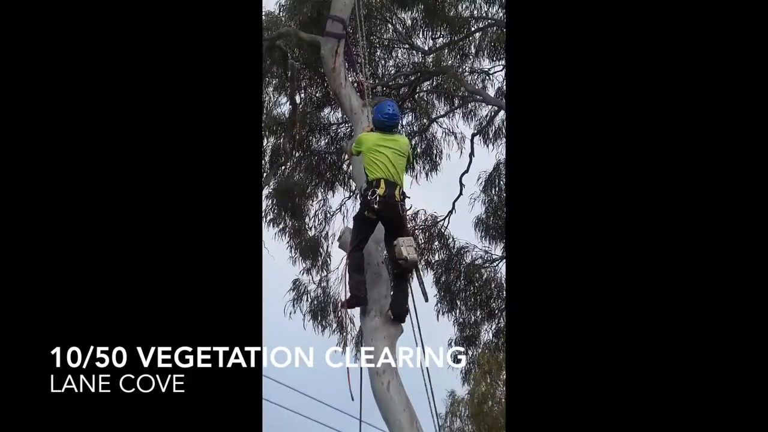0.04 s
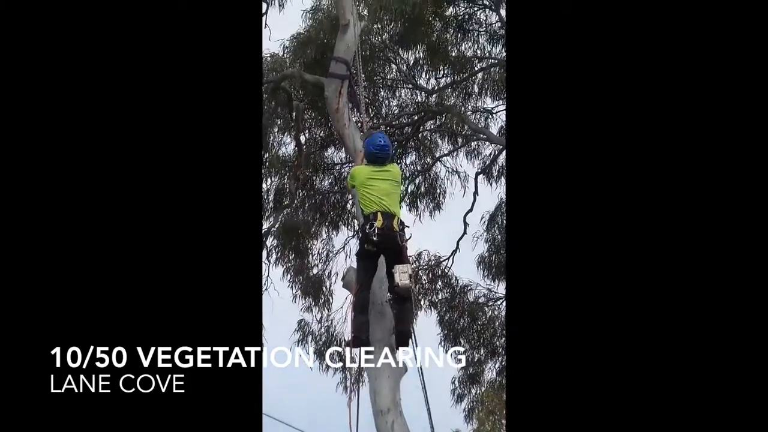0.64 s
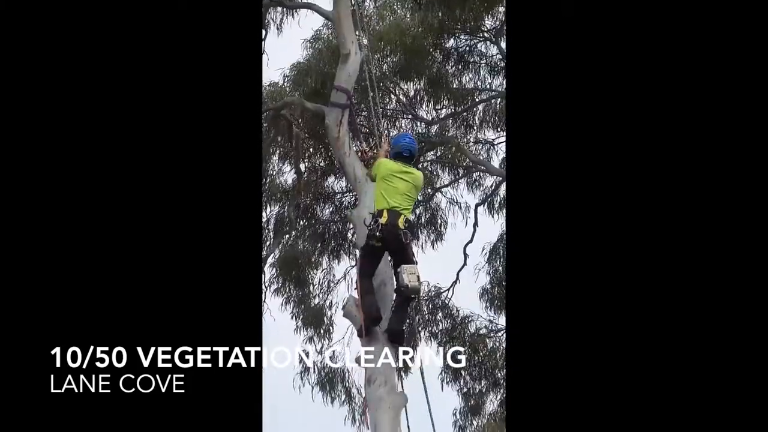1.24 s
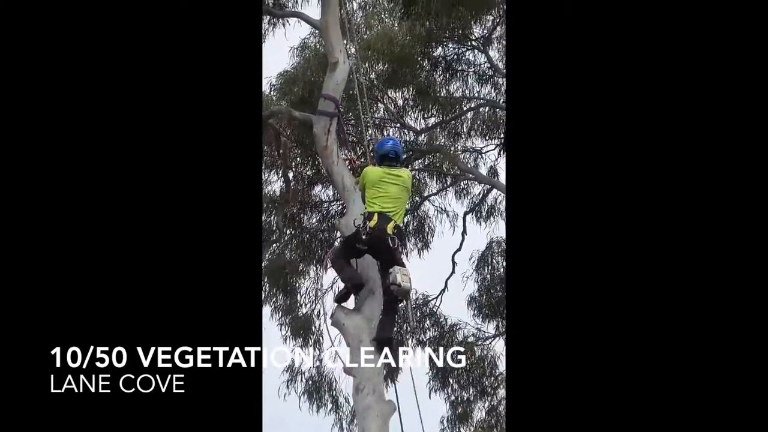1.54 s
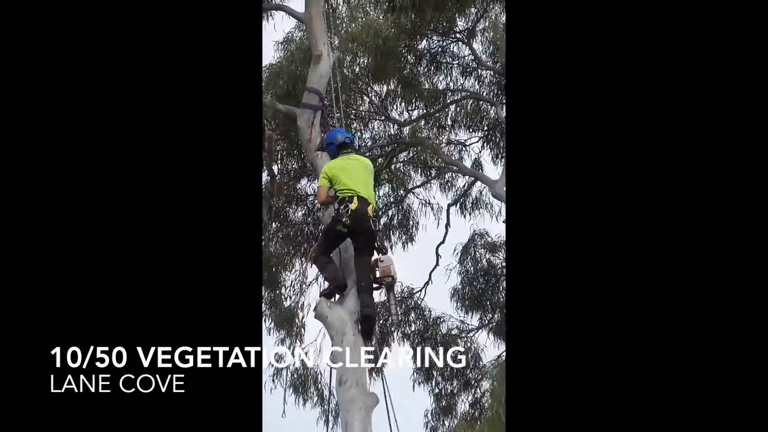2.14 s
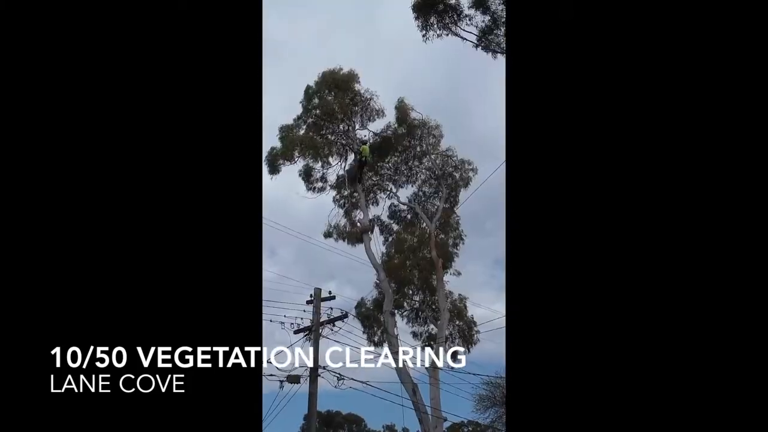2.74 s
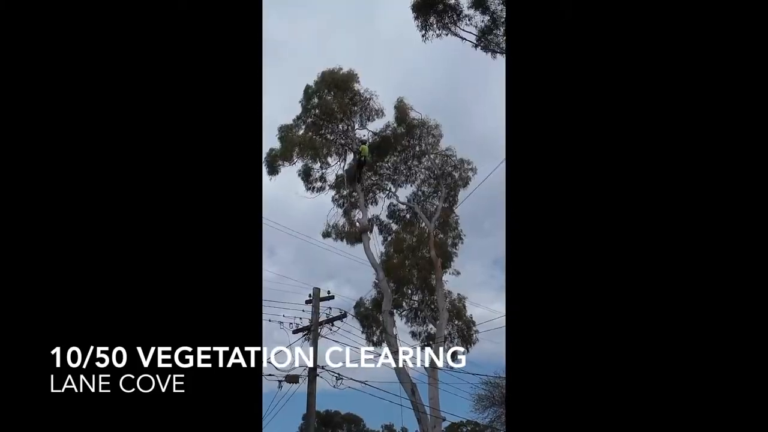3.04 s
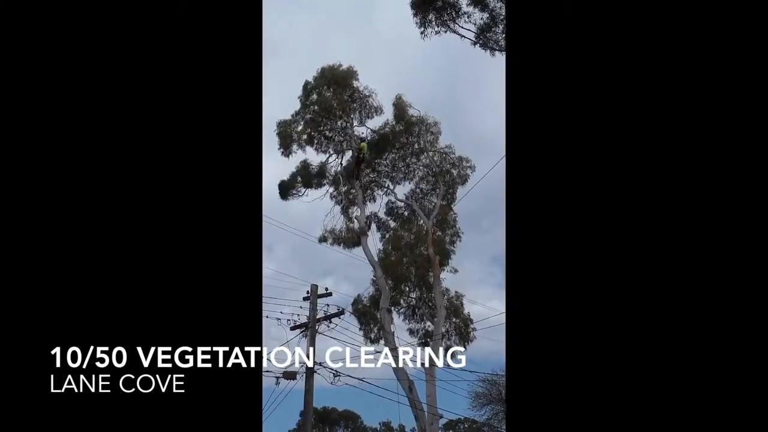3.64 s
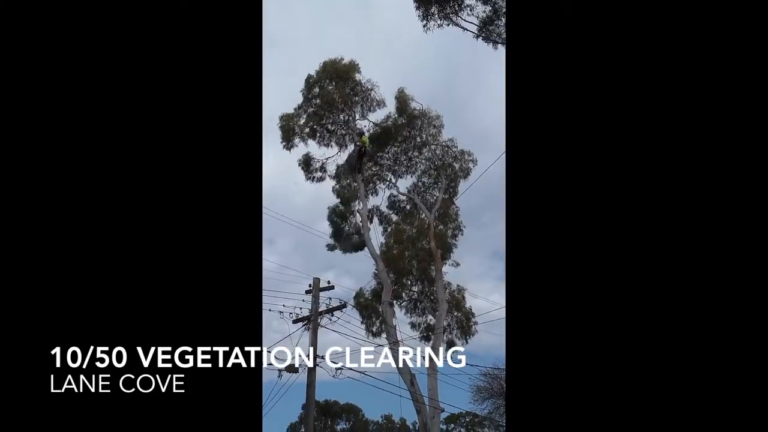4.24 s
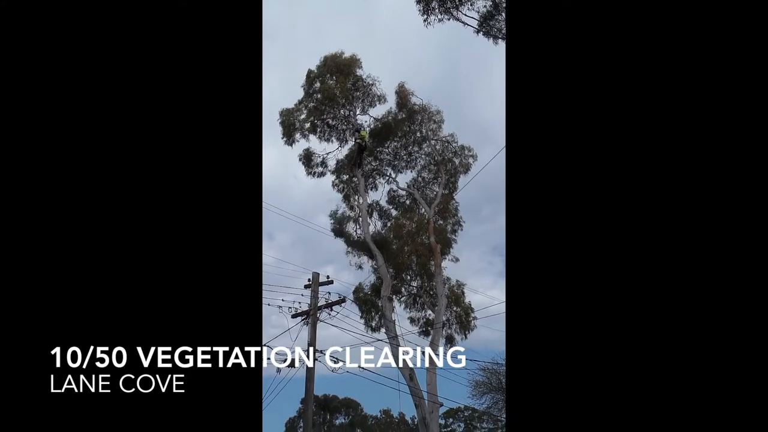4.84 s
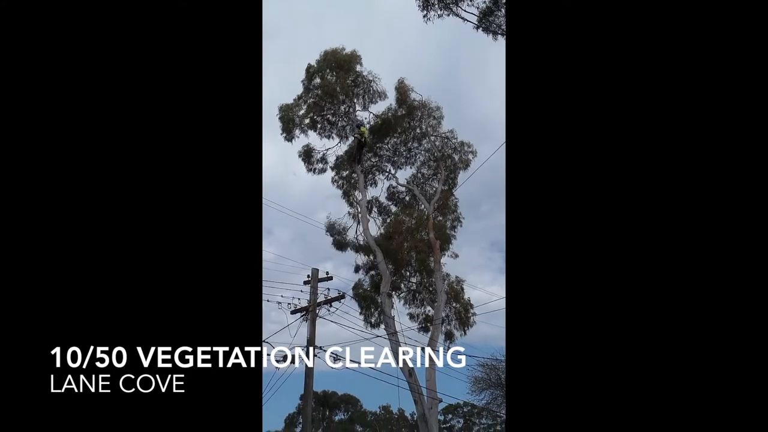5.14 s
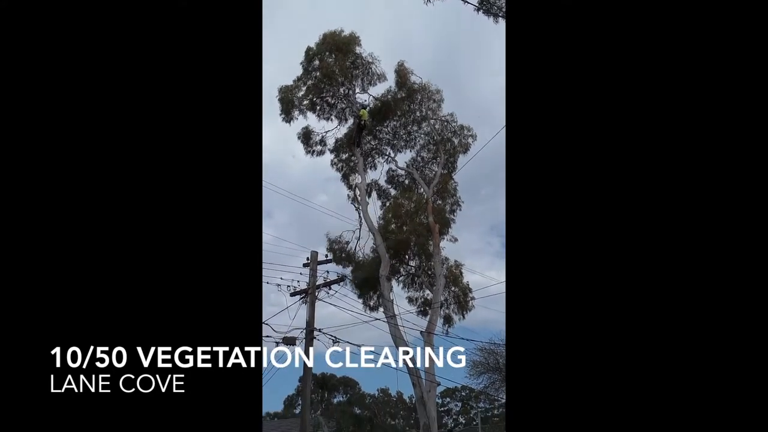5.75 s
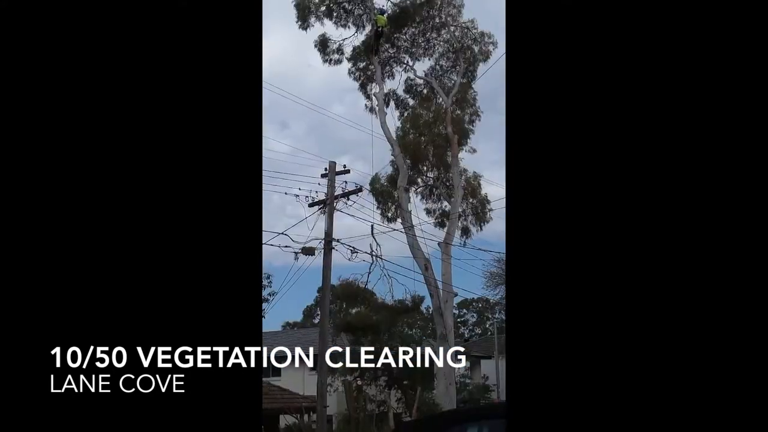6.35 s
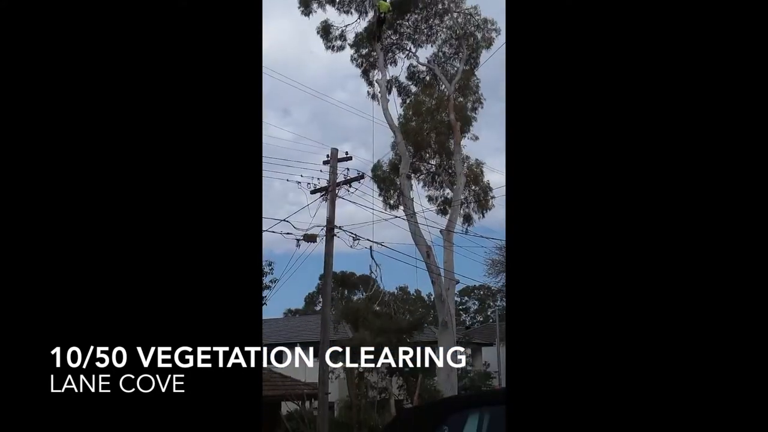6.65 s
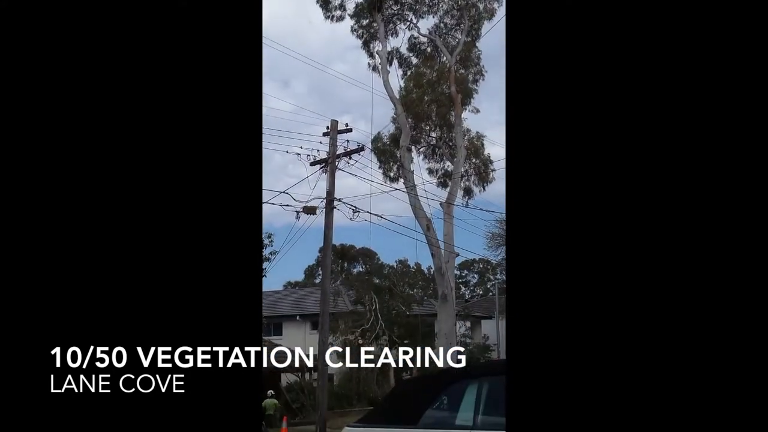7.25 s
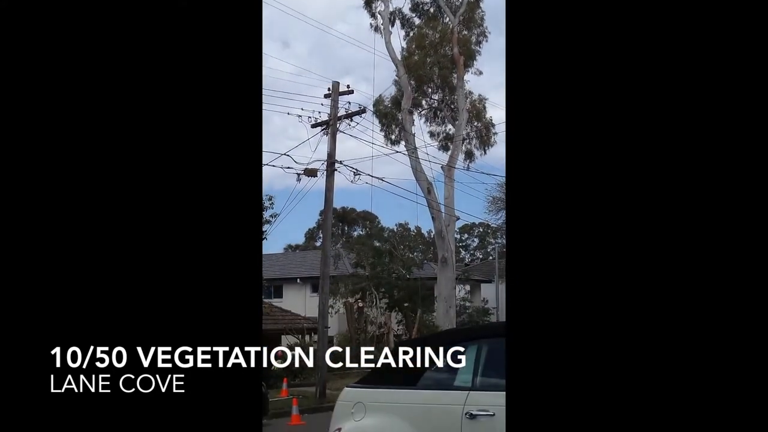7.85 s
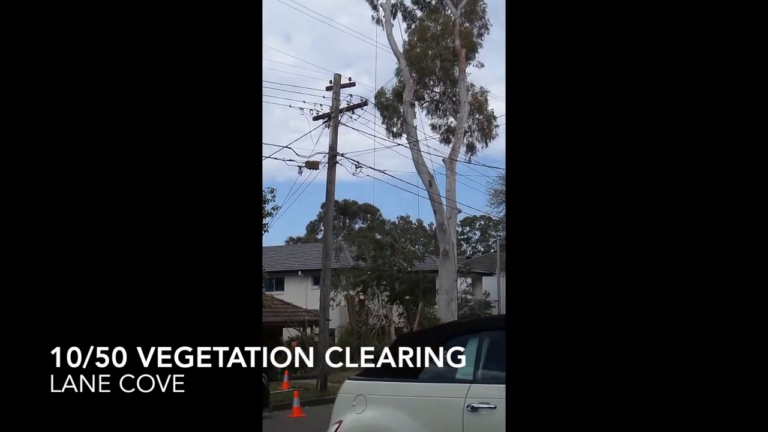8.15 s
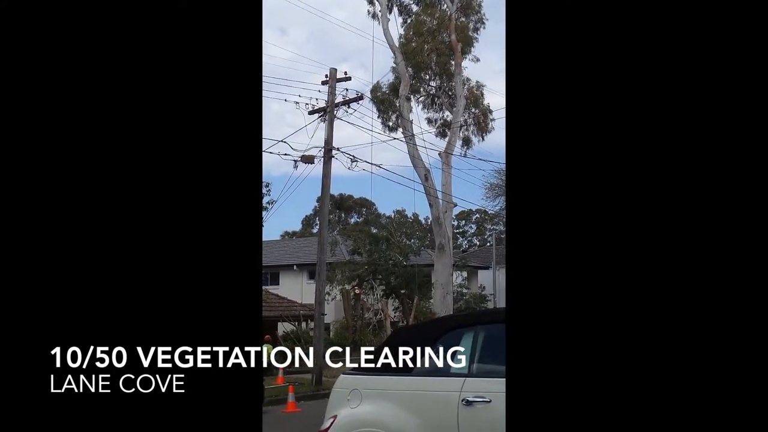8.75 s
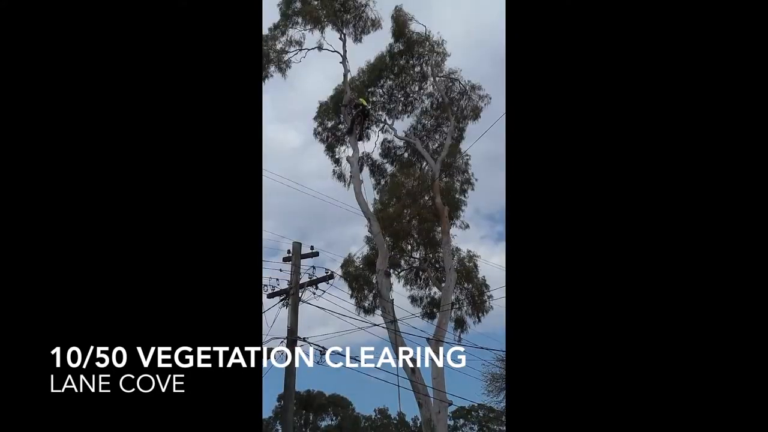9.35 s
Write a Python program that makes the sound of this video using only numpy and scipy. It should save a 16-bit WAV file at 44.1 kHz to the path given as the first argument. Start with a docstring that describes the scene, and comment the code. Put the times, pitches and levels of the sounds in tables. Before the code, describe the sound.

A diesel wood chipper runs outdoors throughout, with a chugging exhaust, low rumble, light clatter and thin gear whine. Just before 1 second, leaves rustle, climbing gear knocks and a twig snaps. At 1 second a hard cut makes the engine faster, and a rope slides briefly around 1.4 seconds. At 2.3 seconds the chipper is slower again, joined by an idling truck, and a two-stroke chainsaw cuts flat out, rasping and screeching with a slight street echo. It is released at 3.1 seconds and winds down, fading by about 4.5. Small twigs snap near 4.2, 4.9 and 6.2 seconds. Steel rings clink faintly at 5.5, then repeatedly from 6.8 to 7.7 seconds, followed by a sharp twig crack at 7.9. At 9.1 seconds another cut brings the chipper closer, faster and louder, with a faint whistle swelling around 9.5 seconds.

```python
"""Diesel wood chipper at tree work, heard from five places in turn with hard cuts, at differing speeds.
Firing puffs ring its pipe over rumble, clatter and gear whine; a truck idles in the last three places.
In the third a two-stroke chainsaw cuts flat out (muffler tone, chain rasp, screech), then winds down.
A climber's steel rings clink, rope slides, gear knocks, leaves rustle and twigs snap."""
import sys
import numpy as np
from scipy import signal
from scipy.fft import rfft, irfft, next_fast_len
from scipy.io import wavfile

SR = 44100
rng = np.random.default_rng(int(sys.argv[2]) if len(sys.argv) > 2 else 0)


def wav_out(sig):
    """Save sig, one row per channel (or a flat mono array), as 16-bit PCM at SR to the path in sys.argv[1]."""
    wavfile.write(sys.argv[1], SR, np.round(np.clip(np.atleast_2d(sig).T, -1, 1) * 32767).astype(np.int16))


N = 422919
T = np.arange(N) / SR

# truck exhaust: multiple of firing rate, level/dB
TRUCK_FAR = [(1, -77), (2, -52), (3, -71), (4, -46.5), (5, -55), (6, -46.5), (7, -49.5), (8, -52.5),
             (9, -67), (11, -61.5), (13, -76)]
TRUCK_NEAR = [(1, -67), (2, -33), (3, -56), (4, -32.5), (5, -60), (6, -47), (7, -53), (8, -44), (10, -59),
              (11, -59)]

# leaf rustle and swish: start/s, end/s, level/dB, rise/(dB/s), fall/(dB/s)
LEAF_BRUSHES = [(.78, .9, -52.5, 39, 35), (0.874, 0.874, -53, 550, 300)]
# resonances of sliding rope and knocking gear: f/Hz, width/Hz, level/dB
ROPE_MODES = [(4000, 700, -3), (5760, 520, 2), (7940, 280, -5), (9500, 4000, -18)]
KNOCK_MODES = [(1550, 450, -6.5), (2080, 480, -1), (3300, 600, -7), (4700, 900, -12)]
# twig breaks: t/s, level/dB, f/Hz, width/Hz, t60/s
SNAPS = [(.905, -47, 2000, 2500, .04), (4.213, -44, 8800, 4070, 0.13), (4.949, -48, 5500, 3500, .16),
         (6.226, -51, 8000, 8000, 0.054), (6.917, -47, 4800, 1500, 0.077), (7.886, -47, 11000, 4000, .025),
         (7.913, -30.5, 4300, 2800, 0.02), (7.921, -44, 6000, 6000, .02), (8.1, -53, 12000, 4000, .04),
         (8.41, -58, 12500, 3000, .06)]
# steel ring modes: f/Hz, level/dB, free t60/s
STEEL_MODES = [(4350, -5, 0.16), (4400, 0.5, 0.16), (4640, -8, .08), (5060, -0.5, 0.27), (7400, -4, 0.21),
               (1795, -2.5, 0.15)]
# ring contacts: t/s, level/dB, bright mode/dB, top mode/dB, body mode/dB, t60 share, main mode f/Hz
CLINKS = [(5.47, -56, 2, 0, 0, 1, 4330), (6.814, -45, -16, -12, 0, .65, 4450),
          (6.917, -41.5, -15, -3, -4, .45, 4420), (7.165, -54, -6, 2, 0, .6, 4480),
          (7.218, -48.5, 3, 0, 8, .9, 4410), (7.364, -46, -16, -14, -3, .7, 4420),
          (7.473, -44, -16, -14, -8, .25, 4470), (7.548, -48, 0, 0, 3, .85, 4400),
          (7.655, -40, -18, -16, -8, .75, 4420)]

# saw firing rate, sagging as the chain bites: t/s, f/Hz
CUT_SPEED = [(2.27, 169.4), (2.39, 167.6), (2.497, 159), (2.574, 162.3), (2.784, 157.4), (2.888, 159.4),
             (3.01, 156.5), (3.13, 157.6)]
# saw muffler, throttle open and shut: f/Hz, level/dB
MUFFLER_OPEN = [(158, -32.5), (316, -40), (475, -41), (560, -45), (640, -30.5), (795, -40), (845, -43),
                (950, -37.5), (1005, -36), (1110, -43.5), (1180, -51), (1270, -43), (1430, -60),
                (1600, -47), (1750, -47), (2200, -52), (2400, -55), (2600, -43), (2800, -50), (3000, -48),
                (4000, -53), (5600, -54)]
MUFFLER_SHUT = [(100, -55), (250, -48.5), (310, -37.5), (385, -40.5), (460, -55), (680, -48), (1200, -62),
                (4000, -76)]
# lift of two partials in the cut: t/s, 4th/dB, 6th/dB
PARTIAL_LIFTS = [(2.28, -0.5, -5), (2.38, -3, 4.5), (2.47, 0, 1), (2.6, 0, -1), (2.7, 0, 1),
                 (2.75, -2.5, 3), (2.82, 3.5, 1), (2.88, -0.5, 1), (3.0, 5.5, -3), (3.05, 0, -1),
                 (3.13, 3.5, -6)]
# gas hiss and chain rasp: f/Hz, level/dB
RASP = [(150, -90), (400, -73.5), (700, -75), (880, -75.5), (1400, -72.5), (1900, -70.5), (2450, -72.5),
        (3100, -69), (3600, -69), (4300, -73), (6000, -74), (7500, -78), (11000, -81.5), (13000, -79.5),
        (15000, -115)]
# saw cover modes: f/Hz, width/Hz, level/dB
COVER_MODES = [(3400, 39, -53), (3540, 32, -54), (3790, 60, -55)]
# guide bar ringing: t/s, level/dB
BAR_LEVELS = [(2.27, -55), (2.35, -50), (2.5, -59), (2.66, -57), (2.75, -42), (2.84, -40), (3.01, -47),
              (3.07, -38), (3.125, -51), (3.17, -44), (3.3, -66)]
# chain screech, flaring at each bite: t/s, level/dB, f/Hz
SCREECH = [(2.279, -39.5, 3520), (2.37, -41, 3540), (2.46, -43, 3620), (2.492, -54, 3580),
           (2.51, -41, 3640), (2.57, -37, 3660), (2.68, -50, 3480), (2.79, -44.5, 3660), (3.0, -42.5, 3622),
           (3.1, -43.5, 3700), (3.15, -46, 3690)]

# listening places and the chipper at each: start/s, end/s, firing rate/Hz, first firing/s,
# alternate cylinder/dB, puff scatter/dB, jitter/s, throb depth
PLACES = [(0, 1.001, 33.39, 0.0087, 0, -1, .00012, 0.2), (1.005, 2.27, 45.03, 0.0089, 1, 0.7, .00012, 0),
          (2.269, 6.295, 33.32, 0.022, -2, -0.2, 0.00013, 0.24),
          (6.3, 9.076, 33.31, .0303, -2, 0, 0.00012, 0.26), (9.08, 9.6, 52.02, .012, 0, 0.5, 0.00013, 0.04)]
# chipper exhaust, a list per view (trunk, trunk at speed, street, close): multiple of firing rate, level/dB
EXHAUSTS = [
    [(1, -64), (2, -72), (3, -37), (4, -38.5), (5, -68), (6, -44.5), (7, -62), (8, -60), (9, -55.5),
     (11, -76), (16, -78)],
    [(1, -61), (2, -50.5), (3, -39.5), (4, -40), (5, -84), (6, -60), (8, -70), (9, -60.5), (12, -79)],
    [(1, -72), (2, -45), (3, -32), (4, -37.5), (5, -55.5), (6, -55), (7, -54), (8, -66), (9, -55.5),
     (11, -76)],
    [(1, -46), (2, -44), (3, -24.5), (4, -34.5), (5, -40.5), (6, -61), (7, -65), (8, -47), (9, -47.5),
     (10, -58), (12, -56), (13, -69), (16, -60)],
]
# gear and pump whines, same views: f/Hz, width/Hz, level/dB
WHINES = [
    [(1094, 5.4, -58), (1803, 11, -62), (5310, 35, -62.5)],
    [(640.5, 5, -60.5), (1490, 4.1, -59.5), (7270, 67, -63)],
    [(246.4, 2, -58), (1114, 2.2, -60.5), (1235, 51, -57.5), (1791, 17, -61), (4130, 13, -67.5),
     (4390, 34, -64.5), (6140, 42, -60)],
    [(2160, 8.5, -60), (3160, 61, -54), (4300, 246, -60), (6100, 154, -59), (10400, 760, -57.5)],
]
# rumble, fan and clatter: f/Hz, level/dB
ROAR_TRUNK = [(25, -95), (55, -60.5), (150, -60.5), (240, -66), (330, -73.5), (400, -79), (560, -74.5),
              (1000, -81.5), (2500, -82), (4000, -90), (6500, -90), (9500, -98), (12500, -101.3),
              (15000, -106)]
ROAR_FAST = [(25, -104), (55, -76), (150, -62.5), (240, -62.5), (330, -69), (400, -77), (560, -79.5),
             (1000, -81), (2500, -83.5), (4000, -86), (6500, -93.5), (9500, -93), (12500, -100.8),
             (15000, -109)]
ROAR_STREET = [(25, -103), (55, -60.5), (150, -54.5), (240, -63.5), (330, -72.5), (380, -77.5), (560, -73),
               (1000, -81), (2500, -82), (4000, -89), (6500, -92), (9500, -97.5), (12500, -105.3),
               (15000, -120)]
ROAR_CLOSE = [(25, -92), (55, -62), (150, -49), (240, -58), (330, -67), (380, -70), (490, -63.5),
              (600, -66.5), (700, -69.5), (830, -71), (1000, -77), (1400, -75.5), (2000, -80),
              (4000, -82.5), (6500, -85), (9500, -88.5), (12500, -103.7), (15000, -120)]
# chipper half orders: multiple of firing rate, level/dB
LOPE_FAR = [(1.5, -62), (2.5, -57), (3.5, -55), (4.5, -61.5), (5.5, -52), (6.5, -59.5), (7.5, -61.5),
            (8.5, -69.5)]
LOPE_NEAR = [(1.5, -62), (2.5, -41), (3.5, -37), (4.5, -50), (5.5, -40.5), (6.5, -51), (7.5, -54),
             (9.5, -57), (10.5, -66)]

RELEASE_S = 3.135  # saw trigger let go


def amp(db):
    """dB to gain."""
    return 10 ** (np.asarray(db) / 20)


def unit(x):
    """Scale to rms 1."""
    return x / np.sqrt(np.mean(x ** 2))


def white(count):
    """Noise, 0 dB per Hz."""
    return rng.standard_normal(count) * np.sqrt(SR / 2)


def walk(count, rate_hz):
    """Random wander, rms 1."""
    knots = np.arange(count) * rate_hz / SR
    return unit(np.interp(knots, np.arange(4096), rng.standard_normal(4096)))


def phase(hz):
    """Running phase in rad."""
    return 2 * np.pi * np.cumsum(hz) / SR


def spectrum_db(hz, points):
    """Interpolate (f/Hz, level/dB) on a log axis; -18 dB/octave past the ends."""
    f, db = np.transpose(points)
    octave, known = np.log2(np.maximum(hz, 1)), np.log2(f)
    return np.interp(octave, known, db) - 18 * np.abs(octave - np.clip(octave, known[0], known[-1]))


def colour(x, points):
    """Minimum-phase filter with the given spectrum."""
    size = 2 * next_fast_len(len(x) // 2 + 4096)
    cepstrum = irfft(np.log(amp(spectrum_db(np.fft.rfftfreq(size, 1 / SR), points))))
    cepstrum[1:size // 2] *= 2
    cepstrum[size // 2 + 1:] = 0
    return irfft(rfft(x, size) * np.exp(rfft(cepstrum)))[:len(x)]


def ring(x, modes):
    """Drive resonances (f/Hz, width/Hz, rms/dB) with x."""
    return sum(amp(db) * unit(signal.lfilter(*signal.iirpeak(hz, hz / min(width_hz, SR / 4), SR), x))
               for hz, width_hz, db in modes)


def swell(start_s, end_s, db, rise_db_per_s, fall_db_per_s):
    """Gain that rises, holds from start to end, falls."""
    early_s, late_s = np.maximum(start_s - T, 0), np.maximum(T - end_s, 0)
    return amp(db - rise_db_per_s * early_s - fall_db_per_s * late_s)


def gate(t, place, edge_s=.0086):
    """1 while the listener is at this place."""
    return np.clip(np.minimum(t - place[0], place[1] - t) / edge_s + .5, 0, 1) ** .5


def firings(t, hz, first_s):
    """Firing numbers within t."""
    return np.arange(np.ceil((t[0] - first_s) * hz), (t[-1] - first_s) * hz)


def pipe(t, hz, puff_s, gains, orders):
    """Puffs ring an exhaust pipe."""
    at = np.clip((puff_s - t[0]) * SR, 0, len(t) - 1).astype(int)
    puffs = np.bincount(at, gains, len(t)) * SR / hz / np.sqrt(2)
    return colour(puffs, [(order * hz, db) for order, db in orders])


def diesel(t, hz, first_s, orders, alternate_db, scatter_db, jitter_s):
    """One puff per firing, scattered in time and level; every other one offset in level."""
    k = firings(t, hz, first_s)
    timing, strength = rng.standard_normal((len(k), 2)).T
    gains = amp(alternate_db * (k % 2) + scatter_db * strength)
    return pipe(t, hz, first_s + k / hz + jitter_s * timing, gains, orders)


def truck(t, hz, orders):
    """A second diesel idles evenly."""
    return diesel(t, hz, 0, orders, alternate_db=-1, scatter_db=.5, jitter_s=.0001)


def leaves():
    """Brushed leaves crackle."""
    crackle = ring(white(N) * amp(1.3 * walk(N, 900)), [(7260, 6500, 0)])
    return crackle * sum(swell(*brush) for brush in LEAF_BRUSHES)


def rope(braid_hz=115):
    """Rope braid buzzes through a ring."""
    friction = white(N) * (1 + .5 * np.sin(2 * np.pi * braid_hz * T))
    return ring(friction, ROPE_MODES) * swell(1.39, 1.46, -51, 400, 200)


def gear_knock():
    """Climbing gear scuffs and knocks on the trunk."""
    scuff = white(N) * amp(2.5 * walk(N, 500))
    return ring(scuff, KNOCK_MODES) * swell(.873, .882, -40.5, 550, 700)


def twigs():
    """Each break is a ragged burst; the air dulls its top."""
    out, t = np.zeros(N), T[:SR // 4]
    for start_s, db, hz, width_hz, t60_s in SNAPS:
        crack = ring(white(len(t)), [(hz, width_hz, db)]) * amp(1.7 * walk(len(t), 610))
        out[int(start_s * SR):][:len(t)] += crack * amp(-60 * t / t60_s)
    return signal.sosfilt(signal.butter(3, 13200, fs=SR, output="sos"), out)


def clinks(scrape_t60_s=.05, chatter_db=2.6, detune=.006):
    """Steel rings scrape, then ring and chatter; shorter when the rope holds them."""
    out, t = np.zeros(N), T[:SR // 3]
    for start_s, db, bright_db, top_db, body_db, share, main_hz in CLINKS:
        clink = ring(white(len(t)), [(4450, 1000, -6)]) * amp(-60 * t / scrape_t60_s)
        for (hz, mode_db, t60_s), strike_db in zip(STEEL_MODES, (0, 0, 0, bright_db, top_db, body_db)):
            gain = amp(mode_db + strike_db + chatter_db * walk(len(t), 230) - 60 * t / (t60_s * share))
            mode_hz = hz * main_hz / STEEL_MODES[1][0] * (1 + detune * walk(len(t), 300))
            clink += gain * np.sin(phase(mode_hz))
        out[int(start_s * SR):][:len(t)] += amp(db) * clink
    return out


def house_echo(x, db=-15, delay_s=.05, t60_s=.45):
    """Add the scattered echo of house fronts."""
    t = T[:SR // 2]
    tail = rng.standard_normal(len(t)) * amp(-60 * t / t60_s) * (t > delay_s)
    return x + amp(db) * signal.fftconvolve(x, tail / np.sqrt(np.sum(tail ** 2)))[:len(x)]


def guide_bar(t, mode_hz=2050, flutter_db=2.5):
    """The rubbing chain rings one wavering bar mode."""
    hz = mode_hz * (1 + .004 * walk(len(t), 119.4))
    tone = unit(amp(flutter_db * walk(len(t), 110)) * np.sin(phase(hz)))
    return tone * amp(np.interp(t, *np.transpose(BAR_LEVELS)))


def screech(t, hz, partials, bursts, half_width_hz=190, grit_db=-8):
    """A chain resonance slides over the engine partials, with grit around it."""
    times_s, db, centres_hz = np.transpose(SCREECH)
    centre_hz = np.interp(t, times_s, centres_hz)
    pitched = sum(partial * np.exp(-.5 * ((k * hz - centre_hz) / half_width_hz) ** 2)
                  for k, partial in enumerate(partials, 1))
    low_noise = signal.sosfilt(signal.butter(2, half_width_hz, fs=SR, output="sos"), bursts)
    grit = low_noise * np.cos(phase(centre_hz))
    return unit(unit(pitched) + amp(grit_db) * unit(grit)) * amp(np.interp(t, times_s, db))


def saw_drive(t, idle_hz=46.1, coast_s=.33, shut_s=.068, hold_s=.23, fade_db_per_s=28.5):
    """Flat out until release; the throttle shuts, the engine coasts to idle and fades."""
    since_s = np.maximum(t - RELEASE_S, 0)
    cut_hz = np.interp(t, *np.transpose(CUT_SPEED))
    hz = idle_hz + (cut_hz - idle_hz) * np.exp(-since_s / coast_s)
    throttle = np.clip(1 - since_s / shut_s, 0, 1)
    return hz, throttle, amp(-fade_db_per_s * np.maximum(since_s - hold_s, 0))


def saw_muffler(t, hz, turns, throttle):
    """Firing harmonics, fluttering more up high: muffled tone and raw partials."""
    times_s, fourth_db, sixth_db = np.transpose(PARTIAL_LIFTS)
    lift_db = {4: np.interp(t, times_s, fourth_db), 6: np.interp(t, times_s, sixth_db)}
    tone, partials = 0, []
    for k in range(1, 37):
        flutter_db = (.9 + .5 * k * hz / 1000) * walk(len(t), 69.9)
        partial = np.sqrt(2) * amp(flutter_db - .5) * np.cos(2 * np.pi * (k * turns + rng.random()))
        open_db = spectrum_db(k * hz, MUFFLER_OPEN) + lift_db.get(k, 0)
        shut_db = spectrum_db(k * hz, MUFFLER_SHUT)
        tone += partial * amp(throttle * open_db + (1 - throttle) * shut_db)
        partials.append(partial)
    return amp(-2.5) * tone, partials


def saw_bursts(turns, throttle, cutters_per_turn=3):
    """Gas noise pulses each turn, chopped by the passing cutters."""
    gas = 2 + np.exp(-(turns % 1) / .47)
    cutters = 1 + .22 * throttle * np.cos(2 * np.pi * cutters_per_turn * turns)
    return white(len(turns)) * unit(gas * cutters) * amp(.57 * walk(len(turns), 400))


def chainsaw(rasp_db_per_octave=10.5, covers_db_per_octave=12):
    """Two-stroke saw; rasp and cover ringing follow speed, covers ring less out of the cut."""
    running = (T > CUT_SPEED[0][0] - .3) & (T < RELEASE_S + 1.5)
    t = T[running]
    hz, throttle, fade = saw_drive(t)
    octaves = np.log2(hz / CUT_SPEED[-1][1])
    unrest = .00304 * throttle + .022 * (1 - throttle)  # teeth shake it; off throttle it stumbles
    hz = hz * (1 + unrest * walk(len(t), 90))
    turns = np.cumsum(hz) / SR
    tone, partials = saw_muffler(t, hz, turns, throttle)
    bursts = saw_bursts(turns, throttle)
    rasp = colour(bursts, RASP) * amp(-.8 + rasp_db_per_octave * octaves + .7 * walk(len(t), 59.6))
    covers = ring(unit(sum(partials)) + unit(bursts), COVER_MODES)
    covers *= amp(-12 + covers_db_per_octave * octaves - 5 * (1 - throttle))
    out = np.zeros(N)
    out[running] = fade * (tone + rasp + covers + guide_bar(t)
                           + throttle * screech(t, hz, partials, bursts))
    return house_echo(out)


def whistle(centre_hz=3182):
    """A thin tone in the machines swells and sinks."""
    hz = centre_hz * (1 + .0014 * walk(N, 40))
    return np.sqrt(2) * np.sin(phase(hz)) * swell(9.46, 9.52, -53, 70, 130)


def whine(count, hz, width_hz, db):
    """Gear tone widened by phase drift; higher ones flutter more."""
    drift_rad = np.sqrt(2 * np.pi * width_hz / SR) * np.cumsum(rng.standard_normal(count))
    flutter = amp((1.2 + .8 * hz / 1000) * walk(count, 90))
    return amp(db) * unit(np.tanh(flutter / 2) * np.sin(2 * np.pi * hz * T[:count] + drift_rad))


def lope(t, place, orders):
    """Two unlike cylinders: the chipper's chug repeats every second firing."""
    hz, first_s = place[2:4]
    k = firings(t, hz, first_s)
    return pipe(t, hz, first_s + k / hz, 1 - 2 * (k % 2), orders)


def chipper(t, place, orders, roar, whines, split_hz=300):
    """Diesel exhaust, rumble throbbing with the firings, light clatter, whines."""
    hz, first_s, alternate_db, scatter_db, jitter_s, throb = place[2:]
    count, cycles = len(t), (t - first_s) * hz
    exhaust = diesel(t, hz, first_s, orders, alternate_db, scatter_db, jitter_s)
    noise = colour(white(count), roar)
    lows = signal.sosfiltfilt(signal.butter(2, split_hz, fs=SR, output="sos"), noise)
    rumble = amp(-3) * lows * unit(1 + throb * np.cos(2 * np.pi * (cycles - .26)))
    clatter_db = .17 * np.cos(4 * np.pi * cycles) + .56 * walk(count, 150) + .22 * walk(count, 5)
    clatter = (noise - lows) * amp(clatter_db)
    return exhaust + rumble + clatter + sum(whine(count, *line) for line in whines)


def scene(truck_far_hz=29.24, truck_near_hz=29.4):
    """Saw and climb over the machines at each place in turn; mono."""
    out = gate(T, PLACES[2]) * chainsaw() + gate(T, PLACES[4]) * whistle()
    out += clinks() + twigs() + gate(T, PLACES[0]) * leaves() + rope() + gear_knock()
    trunk, fast, street, close = zip(
        EXHAUSTS, (ROAR_TRUNK, ROAR_FAST, ROAR_STREET, ROAR_CLOSE), WHINES,
        (None, None, LOPE_FAR, LOPE_NEAR),
        (None, None, (truck_far_hz, TRUCK_FAR), (truck_near_hz, TRUCK_NEAR)))
    for place, view in zip(PLACES, (trunk, fast, street, street, close)):
        orders, roar, whines, half_orders, truck_idle = view
        span = (T > place[0] - .1) & (T < place[1] + .1)
        t = T[span]
        machines = chipper(t, place, orders, roar, whines)
        if truck_idle:
            machines += lope(t, place, half_orders) + truck(t, *truck_idle)
        out[span] += gate(t, place) * machines
    return out[None]


def record(dry, top_hz=15000):
    """Steep low-pass."""
    return signal.sosfilt(signal.ellip(8, .2, 70, top_hz, fs=SR, output="sos"), dry)


dry = scene()
out = record(dry)
wav_out(out)
```